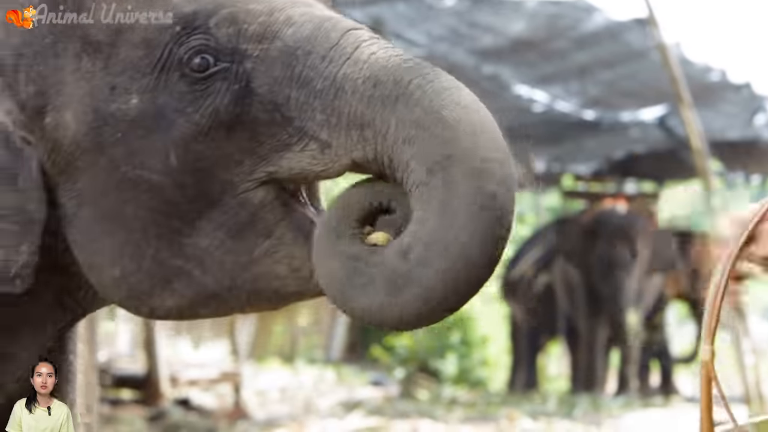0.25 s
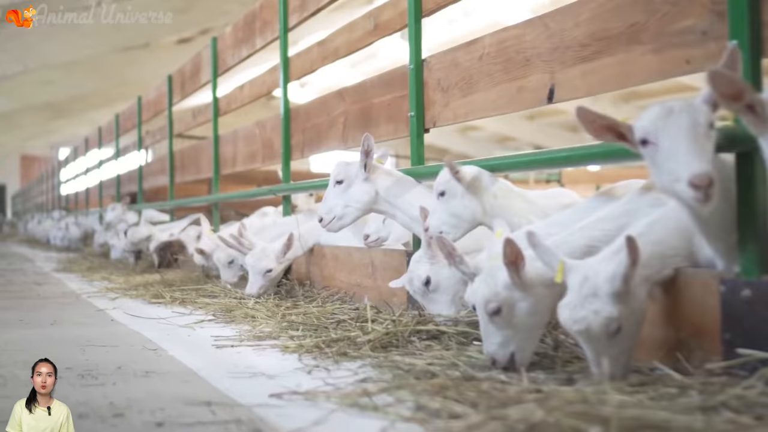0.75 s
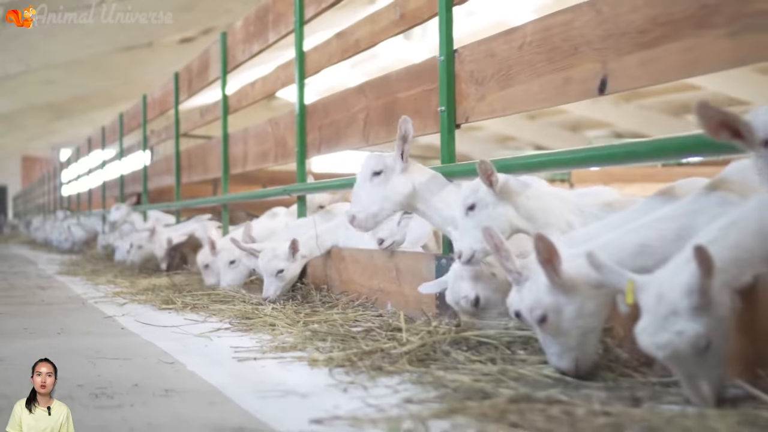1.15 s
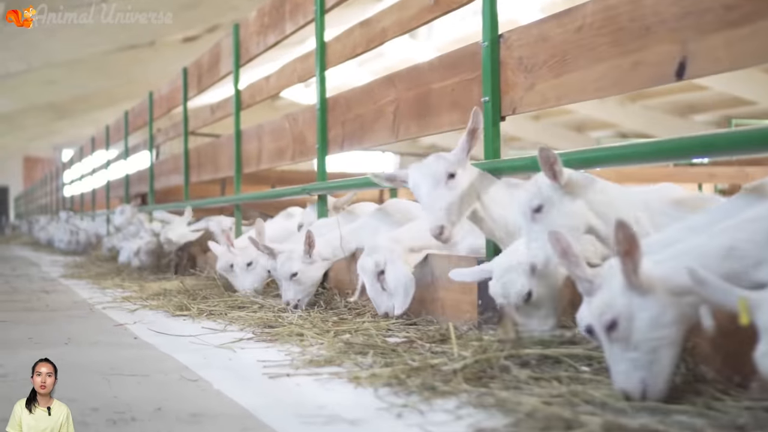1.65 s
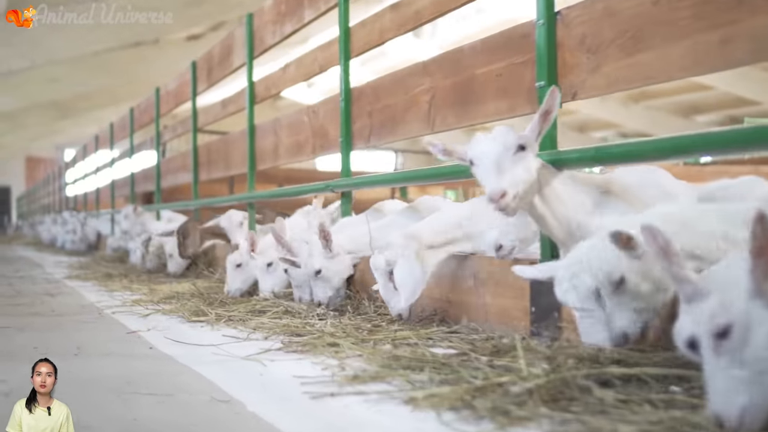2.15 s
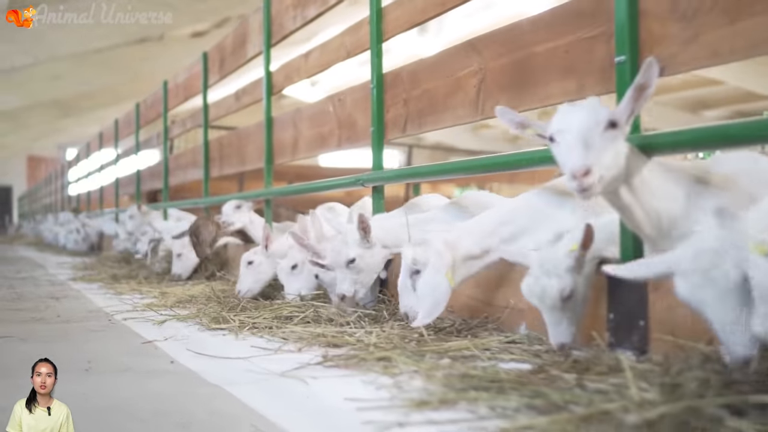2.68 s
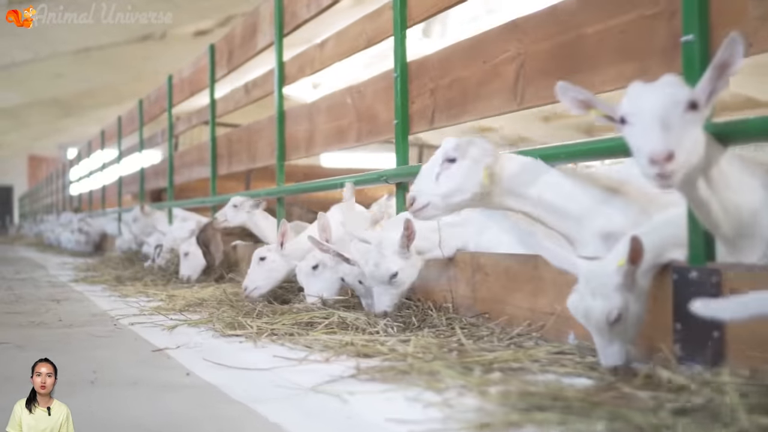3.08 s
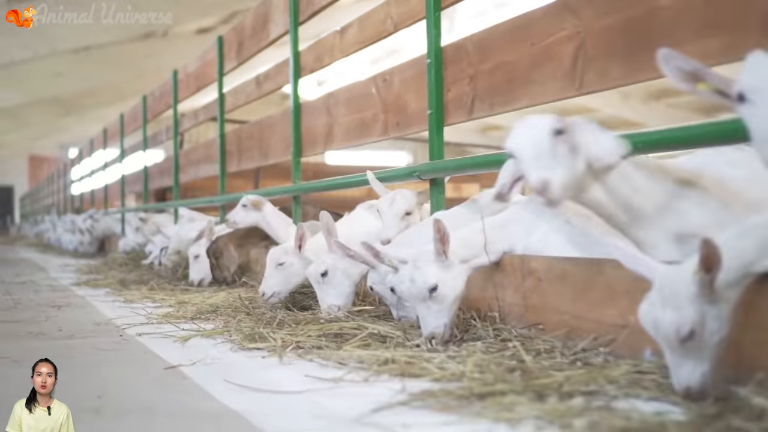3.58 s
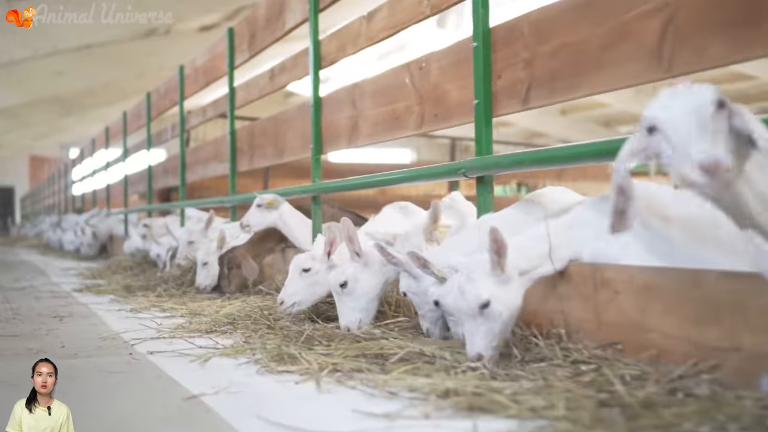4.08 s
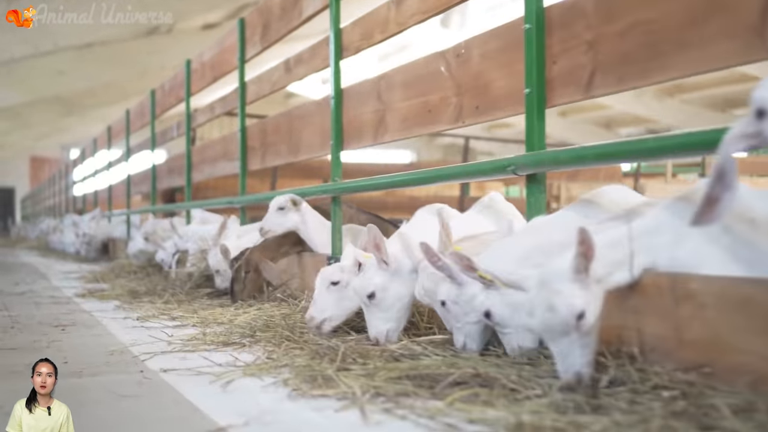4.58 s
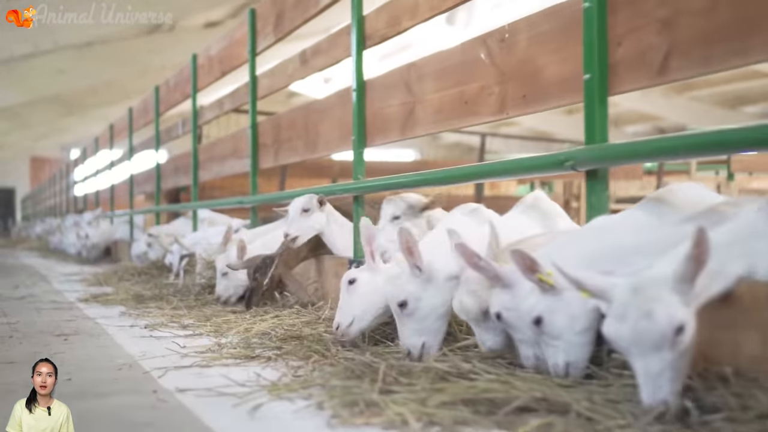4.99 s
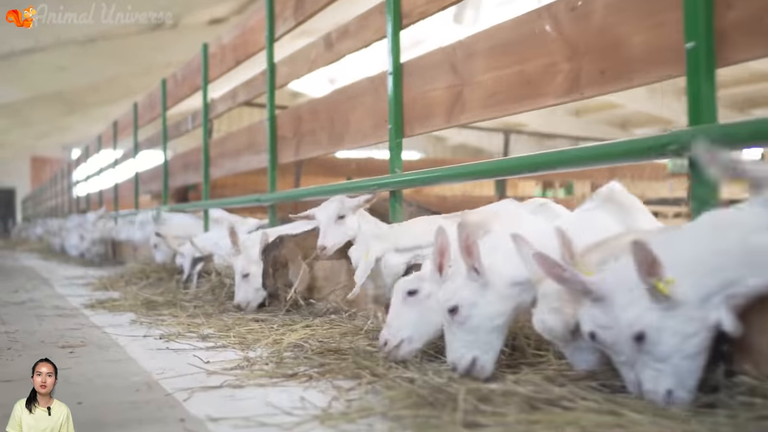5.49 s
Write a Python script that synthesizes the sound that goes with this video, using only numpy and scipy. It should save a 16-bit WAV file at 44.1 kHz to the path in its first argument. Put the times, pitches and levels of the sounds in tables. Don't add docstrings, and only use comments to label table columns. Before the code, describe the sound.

A hoarse elephant roar is cut off abruptly, then goats bleat one after another in a barn with hoof knocks and ticking collar tags.

```python
import sys
import numpy as np
from scipy import signal
from scipy.fft import rfft, irfft, next_fast_len
from scipy.io import wavfile
from scipy.ndimage import uniform_filter1d, map_coordinates

SR = 44100
rng = np.random.default_rng(int(sys.argv[2]) if len(sys.argv) > 2 else 0)


def dump(signal):
    limited = np.clip(np.atleast_2d(signal).T, -1, 1)
    pcm = np.round(limited * 32767).astype(np.int16)
    wavfile.write(sys.argv[1], SR, pcm)


def level_to_linear(level):
    exponent = np.asarray(level, float) / 20
    return 10 ** exponent


N = 253134
CUT_S = .3826

# [f/Hz, density/dB]
YARD = [(300, 0), (2000, -7), (5000, -11), (9000, -22), (15500, -24)]
# [f/Hz, density/dB]
AIR = [(15, -39), (25, -19), (299, -35), (425, 7.5), (749, 2), (1090, 4), (1320, 1), (1470, 0), (2260, -8),
       (3390, -11), (4690, -10), (9210, -18), (15800, -30)]
# [f/Hz, t60/s]
BARN = [(200, .5), (700, .55), (1500, .85), (3500, .6), (14000, .25)]
# [t/s, level/dB]
HERD = [
    (0.39, -43.5),
    (1.22, -55.5),
    (1.97, -52.5),
    (2.34, -42),
    (3.13, -49.5),
    (3.34, -43),
    (4.85, -46),
    (5.01, -51.5),
    (5.46, -46.5),
    (5.74, -36.5),
]
# [f/Hz, density/dB]
SHUFFLE = [(15, -56), (25, -17), (81, -18.5), (108, -5.5), (234, -5), (300, -7), (390, -2), (660, -120)]
# [t/s, level/dB]
SNORT = [
    (1.662, -70),
    (1.675, -45),
    (1.7, -41),
    (1.725, -45),
    (1.76, -72.5),
]
# [f/Hz, density/dB]
NOSTRILS = [(300, -30), (600, 0), (1200, -3), (2200, 1), (3000, -13), (4300, 1), (6000, -11), (14000, -46)]
# [t/s, f/Hz, level/dB]
KID = [
    (2.242, 915, -45),
    (2.4, 1080, -35.5),
    (2.65, 1148, -36.5),
    (2.94, 1085, -38.5),
    (3.03, 800, -48),
    (3.05, 746, -73),
]
# [t/s, peak/dB]
TAPS = [
    (1.5025, -31),
    (1.677, -38),
    (5.093, -32),
]
# [f/Hz, level/dB, t60/s]
RAIL = [(520, 2, 0.042), (1520, 4, 0.016), (2560, 0, 0.012)]
# [t/s, peak/dB, f/Hz, click/dB]
HOOVES = [(0.464, -30.5, 315, -13), (0.594, -35, 222, -16), (0.827, -29, 87, 5), (0.869, -27.5, 89, -21),
          (0.861, -26, 40, -30), (0.99, -33, 60, -30), (1.26, -38, 62.5, -30), (1.504, -32.5, 191, 8.5),
          (1.955, -34, 162, -23), (2.579, -32, 205, -17), (3.315, -25, 171, -16), (3.439, -27, 200, -19),
          (3.6, -34, 167, -12), (3.757, -26.5, 171, 6), (3.931, -24, 262, -18), (4.217, -15, 334, -7),
          (4.677, -20.5, 147, -11), (4.741, -22.5, 110, -25), (4.87, -36, 132, -24), (5.092, -31, 143, 11),
          (5.587, -27.5, 212, -9), (5.677, -19, 312, -2)]
# [t/s, peak/dB]
TAGS = [(0.7423, -37), (0.7632, -28.5), (0.776, -31), (0.7834, -27.5), (1.2263, -36), (1.2374, -30),
        (1.244, -27), (1.652, -37), (1.674, -31), (1.6834, -25.5), (1.691, -28), (2.1187, -32.5),
        (2.1236, -30), (2.137, -34), (2.5474, -40), (2.575, -28.5), (2.587, -26.5), (2.785, -37),
        (2.8726, -32), (2.9916, -46), (3.0212, -33), (3.031, -31), (3.5118, -28.5), (3.5243, -28),
        (3.9345, -26), (3.9412, -30), (4.3795, -38), (4.392, -30), (4.808, -33), (4.8197, -39),
        (4.834, -26.5), (5.235, -36), (5.248, -28.5), (5.2664, -32), (5.6625, -44), (5.6975, -45),
        (5.712, -35.5)]
# [f/Hz, level/dB]
TAG_RING = [(1760, -56), (3000, -21), (4260, -23), (6130, -14), (6760, -5), (7400, -8.5), (13000, -10),
            (14100, -13), (16000, -11.5)]
# [f/Hz, t60/s]
BELL = [(1272, 1), (1630, 1), (3357, 1), (3832, 0.32)]
# [t/s, then level/dB of each mode]
STROKES = [
    (1.11, -35, -35, -38, -48),
    (2.085, -48, -50, -62, -73),
    (4.79, -60, -41.5, -62, -58),
]
# [t/s, level/dB, f/Hz]
ROAR = [
    (0.0, -17, 162),
    (0.12, -16.5, 164.8),
    (0.215, -16, 165.8),
    (0.3, -16, 166),
    (0.379, -17, 167.7),
]
# [f/Hz, gain/dB]
TRUNK = [(40, -32), (110, -8), (165, -4), (250, -7.5), (360, -1), (530, -3.5), (720, -9.5), (900, -15.5),
         (1050, -26.5), (1180, -22.5), (1400, -27.5), (1600, -27), (2300, -31.5), (3800, -52.5),
         (8000, -67), (15000, -68)]

THROB_COUNTS = [5, 5, 3, 9, 8, 6, 4, 5, 6, 6]
# first throb, a third through, two thirds through, last throb [t/s each]
PACES = [
    (.41, .536, .682, .803),
    (.8, .906, 1.003, 1.13),
    (1.79, 1.85, 1.911, 1.976),
    (2.29, 2.532, 2.74, 2.975),
    (3.2, 3.416, 3.642, 3.875),
    (3.96, 4.096, 4.242, 4.39),
    (4.22, 4.29, 4.385, 4.44),
    (4.465, 4.535, 4.652, 4.738),
    (4.965, 5.122, 5.247, 5.38),
    (5.27, 5.436, 5.59, 5.735),
]
TUNES = [(418.3, 419, 419, 396), (494, 496, 511, 494), (434.5, 444, 450, 460), (289, 329, 336, 316),
         (436.4, 459, 450, 409), (295, 341, 345, 354), (438.6, 469, 440, 306), (305.7, 334, 335, 280),
         (411, 450, 415, 480), (337, 432, 434, 415)]
EFFORTS = [(-22.5, -27, -24.5, -27), (-25.5, -17.5, -20, -22.5), (-22, -22, -21, -20.5),
           (-30, -23.5, -22.5, -25.5), (-21.5, -15.5, -16.5, -25), (-23.5, -21, -20.5, -20),
           (-24.5, -15, -20.5, -20), (-17, -17.5, -16, -26.5), (-29, -26.5, -27, -29),
           (-22.5, -19.5, -18.5, -23.5)]
# first, middle, last [level/dB each]
MOUTHS = [(-8, -3.5, -4.5), (-6, -7, 3.3), (-7.5, -0.5, 0), (-8.5, -11.5, -10), (-9.5, -7, -5),
          (-9.5, -10.5, -5.5), (-0.5, 0, -2.5), (-14, -8, -14), (-8, -3, -14), (-9.5, -2.5, -5.5)]
SLACK = [(.03, .03, .035, .05), (.2, .08, .1, .1), (.16, .09, .1, .05), (.15, .05, .05, .2),
         (.25, .08, .065, .06), (.2, .06, .05, .12), (.12, .08, .1, .1), (.05, 0, .04, .08),
         (0, .3, .06, .35), (.25, .1, .115, .1)]
# [dip between throbs/dB, squareness of throb, left lag/ms, pan/dB]
MANNERS = [(14.2, 0.72, -0.22, -2), (24.8, 1.7, -0.21, -3.5), (24.4, 0.9, -0.199, -3.5),
           (4.5, 0.49, -0.052, -1), (23.7, 1.295, -0.109, -2.5), (5.94, 0.37, -0.0446, -1),
           (10.9, 0.63, 0.094, 0.5), (4.47, 1.45, 0.049, 2.5), (2.5, 1.5, -0.24, -0.8),
           (24, 1.095, -0.0495, -0.5)]
LEAN = [0.13, 0.012, 0.16, 0.078, 0.092, 0.077, 0.076, 0.1, 0.023, 0.11]
LATE_MS = [(-3, -0.5, -3, 6, 4.5), (0, -1, 3.5, 2, 3), (8, 2.7, 3),
           (0, -0.5, -1, 0.5, 6.5, 1.5, 10.5, 10, 5.5), (3, 3.5, 4, 3, 3.5, 3, 3.5, 3),
           (-0.5, -0.5, -1, 6.5, 1, 3.5), (0, 4, 5, -6), (10, 10, -3.5, 1, 5.5), (3, -0.5, 2.5, 1.5, 0, 0),
           (0, 3, -0.5, 2.5, 6.5, 3)]
STRESS_DB = [(0.29, .3, -0.64, 0.12, .3), (0.43, -1.6, -0.13, 0.71, -0.61), (1, -0.5, 0.2),
             (-1.7, 0.079, .3, 0.021, 0.11, 0.17, -0.27, 0.98, -0.37),
             (.3, 1.2, -0.78, 0.15, -1, 0.013, 0.68, -0.067), (.3, 0.45, 0.27, .3, 0.33, .3),
             (-0.5, -1, 0, -2), (0.19, .3, -1, 1.3, 1.2), (.3, .3, 0.28, .3, .3, .3),
             (-0.23, -1, -0.74, 0.21, -0.084, 0.93)]
WIDER_DB = [(-2, -2, -0.5, -0.5, 0), (-1.3, -2, -3, 3, 2), (-2.5, 0.9, 0.1),
            (-10, 3, 0.8, -0.7, -1.3, 0.8, .3, 1.2, 0), (-2.5, .3, -0.6, 0, 0, -1, -2, 0),
            (.3, .3, .3, .3, 0.28, .3), (.3, .3, .3, .3), (1.5, .3, .3, .3, 3.3),
            (1.7, .3, 0.34, .3, .3, .3), (.3, 0.36, 0.27, .3, .3, 0.33)]
BREATH = [.14, .12, .18, .05, .17, .12, .18, .09, .03, .07]
ECHO_DB = [-11, -7, -10.5, -12.5, -13, -9.5, -10, -15, -13, -14.5]
JAW_GAINS = [0.13, 0.86, 0.45, .11, .11, 0.092, 0.1, 0.13, 0.12, 0.12]
# [f/Hz, gain/dB]
JAWS = [
    [(420, 4), (850, -6.5), (1270, -4), (1680, -2.5), (2100, -8.5)],
    [(500, -7), (1000, -11.5), (1480, -1), (2000, -17), (2400, -11)],
    [(450, -8), (900, -1), (1340, -2.5), (1800, -7), (2300, -6)],
    [(330, 0), (660, 1.5), (1000, -3), (1650, -9), (1980, -13), (2280, -23.5), (2600, -14)],
    [(450, 1), (910, -3), (1760, -0.5), (2270, -17.5), (2720, -20)],
    [(340, -2), (690, 0), (1020, -3.5), (1370, -6.5), (2000, -10.5), (2450, -13.5)],
    [(460, -3.5), (930, 5.5), (1180, 10.5), (1450, -2), (2230, -26)],
    [(330, -16), (660, -12), (840, 15), (980, -2.5), (1200, -12), (1960, -10), (2400, -27)],
    [(420, -10), (850, -8.5), (1240, -5.5), (1640, -4), (2100, -2.5)],
    [(420, 3), (850, -5.5), (1280, -7), (1700, -3.5), (2150, -12.5)],
]
# [f/Hz, gain/dB]
THROAT_TOPS = [
    [(3000, -13.5), (3800, -23.5), (4600, -18.5), (5500, -24), (6600, -22), (9000, -35), (14000, -50)],
    [(2900, -21), (3500, -6.5), (4550, -7), (5650, -10), (7000, -16.5), (9600, -28.5), (14000, -41)],
    [(3000, -10.5), (4600, 1), (5600, -8), (8000, -13.5), (14000, -33.5)],
    [(3070, -13), (3830, -26), (5800, -31.5), (14000, -47.5)],
    [(3200, -12), (3950, -35), (4900, -13.5), (5700, -27), (6500, -21.5), (7550, -37.5), (9200, -28.5),
     (14000, -67)],
    [(3070, -8.5), (3700, -21.5), (7400, -24), (14000, -45.5)],
    [(3050, 0.5), (3800, -10), (7600, -27), (14000, -59)],
    [(2920, -12.5), (3700, -9.5), (4200, -23.5), (4750, -9.5), (5500, -27), (6270, -11.5), (7400, -33.5),
     (14000, -55)],
    [(2600, 2), (3200, -4), (4400, -26), (5800, -13.5), (6800, -23.5), (8500, -34), (14000, -67)],
    [(2800, -25), (3540, -12), (4500, -23.5), (5500, -19), (8000, -23), (9500, -40), (14000, -64)],
]


def unit(x):
    return x / np.sqrt(np.mean(x ** 2) + 1e-20)


def along(points, hz):
    f, v = np.transpose(points)
    return np.interp(np.log(hz + 1), np.log(f + 1), v)


def filtered(x, response):
    m = next_fast_len(x.shape[-1] + 8192)
    return irfft(rfft(x, m) * response(np.fft.rfftfreq(m, 1 / SR)), m)[..., :x.shape[-1]]


def above(corner_hz):
    return lambda f: 1 / (1 + (corner_hz / (f + 1)) ** 8)


def causal(points):
    def response(hz):
        cep = irfft(np.log(level_to_linear(along(points, hz)) + 1e-5))
        cep[1:len(cep) // 2] *= 2
        cep[len(cep) // 2 + 1:] = 0
        return np.exp(rfft(cep))
    return response


def wobble(size, rate):
    knots = rng.standard_normal(int(size * rate / SR) + 4)
    return map_coordinates(knots, [np.arange(size) * rate / SR])


def arch(knots, count):
    curve = np.polyfit(np.linspace(0, 1, len(knots)), knots, len(knots) - 1)
    return np.polyval(curve, np.linspace(0, 1, count))


def rush(spectrum, alike, patchy_db):
    z = signal.stft(rng.standard_normal((2, N)), nperseg=512)[2]
    field = uniform_filter1d(rng.standard_normal(z.shape[1:]), size=6, axis=0)
    field = uniform_filter1d(field, size=12, axis=1)
    two = signal.istft(z * level_to_linear(patchy_db * unit(field)), nperseg=512)[1][:, :N]
    mid, side = filtered(two, lambda hz: level_to_linear(along(spectrum, hz)))
    turn = np.arccos(np.clip(alike, 0, 1)) / 2
    mid, side = np.cos(turn) * mid, np.sin(turn) * side
    return unit(np.array([mid + side, mid - side]))


def folds(hz, breath, jitter, scatter_db, hiss_hz):
    cycles = np.cumsum(hz * (1 + jitter * wobble(len(hz), 150))) / SR
    at = np.interp(np.arange(1, int(cycles[-1])), cycles, np.arange(len(hz)))
    spot = np.round(at)[:, None] + np.arange(-8, 9)
    off = spot - at[:, None]
    taps = np.sinc(off) * np.cos(np.pi * off / 18) ** 2
    taps *= level_to_linear(scatter_db * rng.standard_normal(len(hz))[:len(at), None])
    spot = np.clip(spot, 0, len(hz) - 1).astype(int)
    pulses = np.bincount(spot.ravel(), taps.ravel(), len(hz))
    puffs = rng.standard_normal(len(hz)) * np.exp(-2.5 * (cycles % 1))
    puffs = filtered(unit(puffs), lambda f: 1j * f / (hiss_hz + 1j * f))
    return np.sqrt(1 - breath) * unit(pulses) + np.sqrt(breath) * puffs


def near_boards(x, turns):
    knots = rng.standard_normal(60)
    return filtered(x, lambda f: np.exp(-1j * f * .02 + 1j * turns * map_coordinates(knots, [f / 450])))


def barn(x, first_s=0.0041, alike_hz=700):
    hz, t, z = signal.stft(rng.standard_normal((2, 3 * SR // 4)), SR, nperseg=256)
    apart = np.clip(hz / alike_hz, 0, 1)[:, None]
    z[1] = np.sqrt(1 - apart) * z[0] + np.sqrt(apart) * z[1]
    decay = level_to_linear(-60 * t / along(BARN, hz)[:, None])
    tail = signal.istft(z * decay, SR, nperseg=256)[1]
    tail *= 1 - np.exp(-np.arange(tail.shape[1]) / SR / first_s)
    return signal.fftconvolve(x[None], tail / np.linalg.norm(tail[0]), axes=1)


def pair(x, lag_ms, pan_db):
    side = np.array([[.5], [-.5]])
    both = np.array([x, x])
    return filtered(both, lambda hz: level_to_linear(side * pan_db) * np.exp(-2j * np.pi * hz * side * lag_ms / 1000))


def add(out, part, start):
    end = min(N, start + part.shape[1])
    out[:, start:end] += part[:, :end - start]


def yard():
    return level_to_linear(-57) * rush(YARD, alike=0.66, patchy_db=-1.0)


def fan():
    return level_to_linear(-56.5 + 1.4 * wobble(N, 3.65)) * np.sin(2 * np.pi * 61.5 * np.arange(N) / SR)


def herd():
    s, stir_db = np.transpose(HERD)
    stir_db = np.interp(np.arange(N) / SR, s, stir_db)
    shuffle = level_to_linear(stir_db + 6 + 2 * wobble(N, 12)) * rush(SHUFFLE, alike=.88, patchy_db=1.5)
    air_db = -40 + 0.48 * (stir_db - stir_db.mean()) + 0.37 * wobble(N, 16)
    return shuffle + level_to_linear(air_db) * rush(AIR, alike=0.3, patchy_db=2.6)


def snort():
    s, level_db = np.transpose(SNORT)
    level_db = np.interp(np.arange(N) / SR, s, level_db, -120, -120)
    return level_to_linear(level_db + 2.5 * wobble(N, 90)) * rush(NOSTRILS, alike=0.36, patchy_db=1.0)


def kid():
    s, hz, level_db = np.transpose(KID)
    t = np.arange(N) / SR
    third_hz = np.interp(t, s, hz) * (1 + .008 * wobble(N, 30))
    turn = 2 * np.pi * np.cumsum(third_hz) / SR / 3
    cry = np.sin(3 * turn) + .3 * np.sin(4 * turn) + .3 * np.sin(2 * turn) + .2 * np.sin(6 * turn)
    cry *= level_to_linear(np.interp(t, s, level_db, -120, -120) + 6.5 + 1.5 * wobble(N, 4.1))
    return pair(cry, lag_ms=0.23, pan_db=-2.5) + level_to_linear(-34.5) * barn(cry)[:, :N]


def horns():
    taps, t = np.zeros(N), np.arange(3000) / SR
    for s, peak_db in TAPS:
        ring = np.zeros(len(t))
        for hz, db, t60 in RAIL:
            ring += level_to_linear(db + rng.normal(0, 1.1) - 60 * t / t60) * np.sin(2 * np.pi * hz * t)
        taps[round(s * SR):][:len(t)] += level_to_linear(peak_db) * ring
    return pair(taps, lag_ms=.02, pan_db=-.4) + level_to_linear(-9) * barn(taps)[:, :N]


def hooves():
    knocks, t = np.zeros(N + 6000), np.arange(6000) / SR
    for s, peak_db, hz, click_db in HOOVES:
        ring = np.sin(2 * np.pi * hz * t) * level_to_linear(-60 * t / 0.12)
        ring += 0.79 * np.sin(2 * np.pi * 2.04 * hz * t) * level_to_linear(-60 * t / 0.078)
        click = rng.standard_normal(len(t)) * level_to_linear(click_db + 12 - 60 * t / .03)
        click = filtered(click, lambda f: 1 / (1 + 1j * f / 1100) ** 2)
        knocks[round(s * SR):][:len(t)] += level_to_linear(peak_db) * (ring * (1 - np.exp(-t / 0.0018)) + click)
    return pair(knocks[:N], lag_ms=0.0085, pan_db=-1.5) + level_to_linear(-31.0) * barn(knocks)[:, :N]


def tags():
    ticks, t = np.zeros(N + 2000), np.arange(600) / SR
    graze_s, graze_db = .025, -16
    shifts = rng.uniform(-1.0, 1, len(TAGS))
    grazes = [(s + graze_s * u, db + graze_db) for (s, db), u in zip(TAGS, shifts)]
    for s, level_db in [*TAGS, *grazes]:
        burst = rng.standard_normal(len(t)) * level_to_linear(-60 * t / .006) * (1 - np.exp(-t / .0006))
        burst = filtered(burst, causal(TAG_RING))
        ticks[round(s * SR):][:len(t)] += level_to_linear(level_db + 7.5) * burst / np.abs(burst).max()
    return pair(ticks[:N], lag_ms=.015, pan_db=1.2) + level_to_linear(-14) * barn(ticks, first_s=.003)[:, :N]


def bell():
    ring, t = np.zeros(N + SR), np.arange(SR) / SR
    for s, *levels_db in STROKES:
        for (hz, t60), db in zip(BELL, levels_db):
            sway = level_to_linear(db + 1.5 * wobble(SR, 12) - 60 * t / t60) * (1 - np.exp(-t / .004))
            ring[round(s * SR):][:SR] += sway * np.sin(2 * np.pi * hz * t)
    return pair(ring[:N], lag_ms=0.058, pan_db=1.0)


def elephant():
    s, level_db, hz = np.transpose(ROAR)
    t = np.arange(-SR // 2, SR // 2) / SR
    pitch = np.interp(t, s, hz)
    source = folds(pitch, breath=.24, jitter=.02, scatter_db=2.2, hiss_hz=120)
    roar = unit(near_boards(filtered(source, causal(TRUNK)), turns=1.66))
    roar *= level_to_linear(np.interp(t, s, level_db) + 1.3 * wobble(SR, 29.7))
    heard = level_to_linear(-2.5) * pair(roar, lag_ms=.3, pan_db=-.6)
    heard += level_to_linear(-4) * barn(roar, alike_hz=350)[:, :SR]
    heard += level_to_linear(-24 + 2 * wobble(SR, 23)) * np.sin(2 * np.pi * np.cumsum(pitch) / SR)
    return np.pad(heard[:, SR // 2:], ((0, 0), (0, N - SR // 2)))


def throat(source, k):
    gape, gape_rate = .04, 11
    lowest_hz, lowest_db = JAWS[k][0]
    points = [(lowest_hz / 2, lowest_db - 27), *JAWS[k], *THROAT_TOPS[k]]
    shut = filtered(source, causal(np.multiply(points, [1 - gape, 1])))
    wide = filtered(source, causal(np.multiply(points, [1 + gape, 1])))
    jaw_at = .5 + .5 * np.tanh(wobble(len(source), gape_rate))
    return near_boards(shut + jaw_at * (wide - shut), turns=1.3)


def mouth(voice, k, t, dip, bright_db, opening_db):
    dip_db = MANNERS[k][0]
    high = filtered(voice, above(2500))
    low = voice - high
    hum = filtered(voice, lambda f: 1 / (1 + (f / 620) ** 8))
    linger = level_to_linear(dip_db * (dip - .8 * np.interp(t - .011, t, dip)))
    linger *= level_to_linear(-0.57 * opening_db)
    upper = filtered(low, above(1120))
    opened = level_to_linear(JAW_GAINS[k] * opening_db)
    body = (low + hum * (linger - 1) + upper * (opened - 1)) / np.std(low)
    lips_db = 1.5 * np.array([wobble(len(t), 22), wobble(len(t), 22)])
    return body * level_to_linear(lips_db[0] / 2) + unit(high) * level_to_linear(bright_db + lips_db[1] - 0.012 * dip_db * dip)


def bleat(k):
    dip_db, square = MANNERS[k][:2]
    s, hz, level_db, bright_db = (arch(rows[k], THROB_COUNTS[k]) for rows in (PACES, TUNES, EFFORTS, MOUTHS))
    start = round((s[0] - .073) * SR)
    t = np.arange(start, round((s[-1] + .067) * SR)) / SR + .003
    s = s + np.divide(LATE_MS[k], 1000)
    level_db, bright_db = level_db + STRESS_DB[k], bright_db + WIDER_DB[k]

    beat = np.interp(t, [s[0] - .09, *s, s[-1] + 0.101], np.arange(-1, len(s) + 1))
    gap = np.sin(np.pi * np.clip(beat, -.5, len(s) - .5)) ** 2
    dip = np.abs(np.sin(np.pi * (beat + LEAN[k] * gap))) ** np.clip(2 * square, 1.4, 4)
    ends = np.clip(1.52 + 2.74 * np.minimum(beat, len(s) - 1 - beat), 0, 1) ** 2

    onset, first, later, last = SLACK[k]
    sags = [onset, first, *[later] * (len(s) - 2), last]
    sag = np.take(sags, np.floor(beat + 1).astype(int))
    pitch = np.interp(t, s, hz) * (1.005 - sag * gap ** np.clip(.5 * square, .7, 1))
    pitch *= 1 + .007 * wobble(len(t), 35)
    hoarse = BREATH[k] + .45 * np.clip(.7 - beat, 0, 1)
    source = folds(pitch, hoarse, jitter=.004, scatter_db=.7, hiss_hz=2500)

    bright = np.interp(t, s, bright_db)
    voice = mouth(throat(source, k), k, t, dip, bright, bright - bright_db.mean())
    depth_db = dip_db + 35 * (sag - later)
    return start, voice * ends * level_to_linear(np.interp(t, s, level_db) - depth_db * dip)


def goats():
    out = np.zeros((2, N))
    for k, (_, _, lag_ms, pan_db) in enumerate(MANNERS):
        start, voice = bleat(k)
        add(out, pair(voice, lag_ms, pan_db), start)
        add(out, level_to_linear(ECHO_DB[k]) * barn(voice), start)
    return out


def scene():
    in_barn = np.arange(N) >= CUT_S * SR
    barn_life = fan() + herd() + snort() + kid() + hooves() + tags() + bell() + goats()
    return np.where(in_barn, barn_life, yard() + elephant()) + horns()


def top_cut(x):
    return signal.sosfilt(signal.butter(12, 17060, fs=SR, output="sos"), x)


def record(dry):
    ceiling, knee, top_hz = .95, 7, 16050
    held = dry / (1 + np.abs(dry / ceiling) ** knee) ** (1 / knee)
    mix = filtered(held, lambda hz: 1 / (1 + (hz / top_hz) ** 60))
    return top_cut(mix)


dry = scene()
out = record(dry)
dump(out)
```